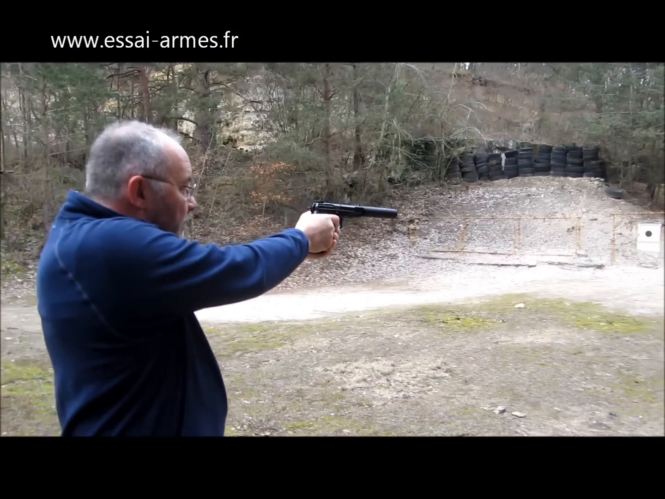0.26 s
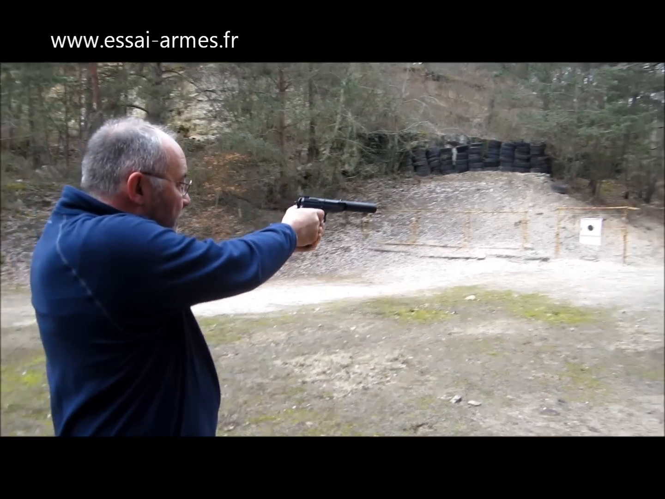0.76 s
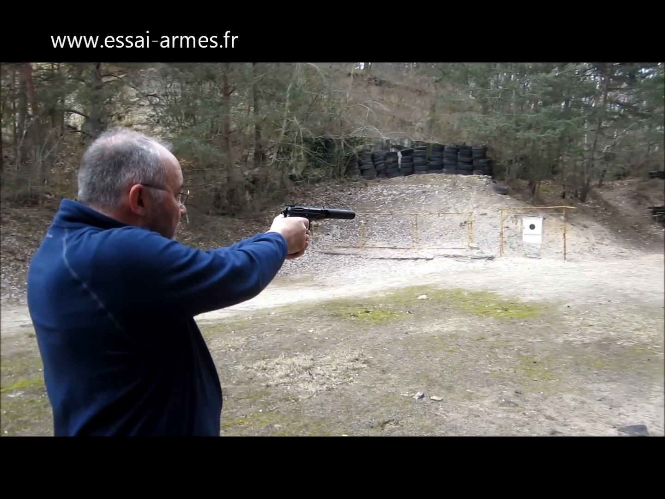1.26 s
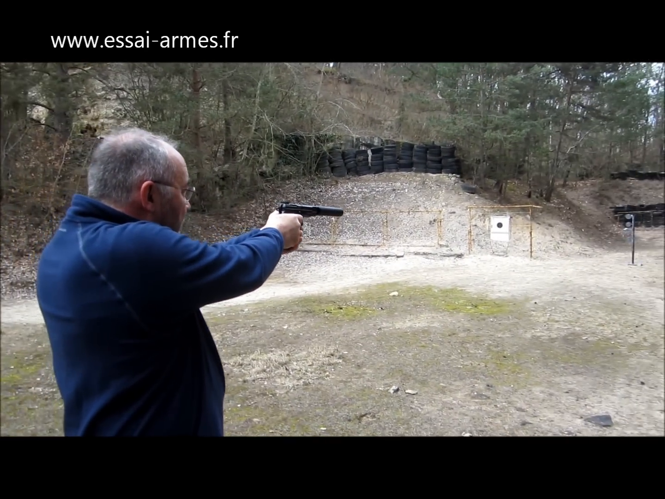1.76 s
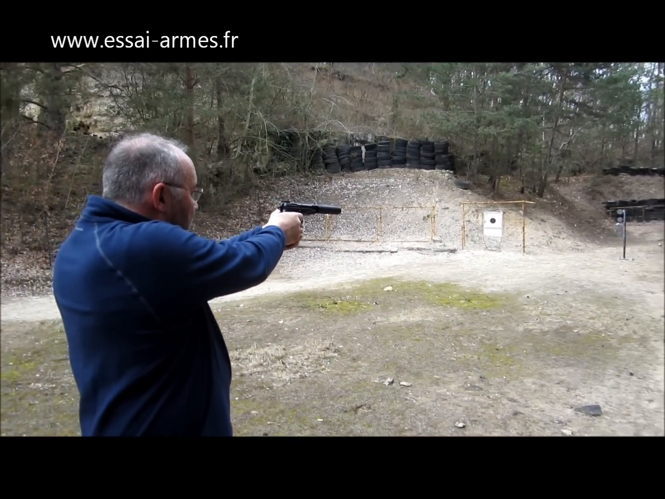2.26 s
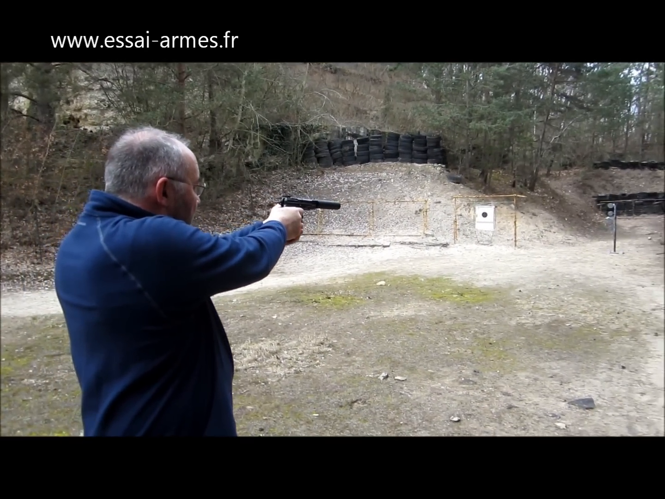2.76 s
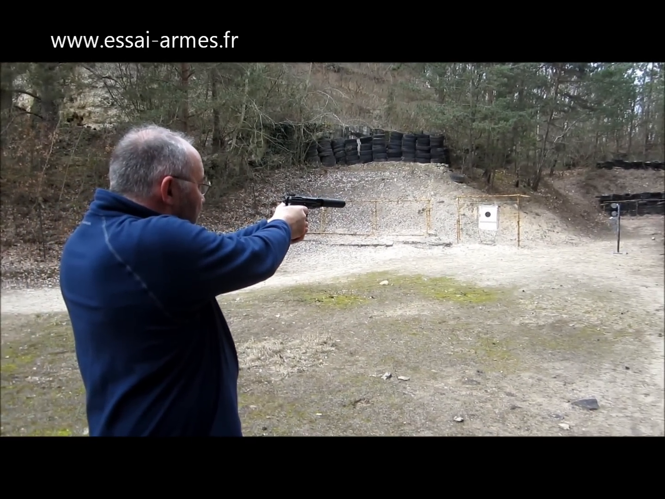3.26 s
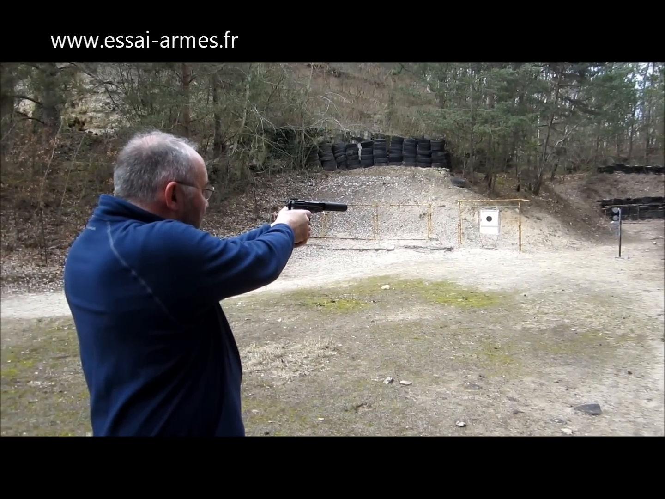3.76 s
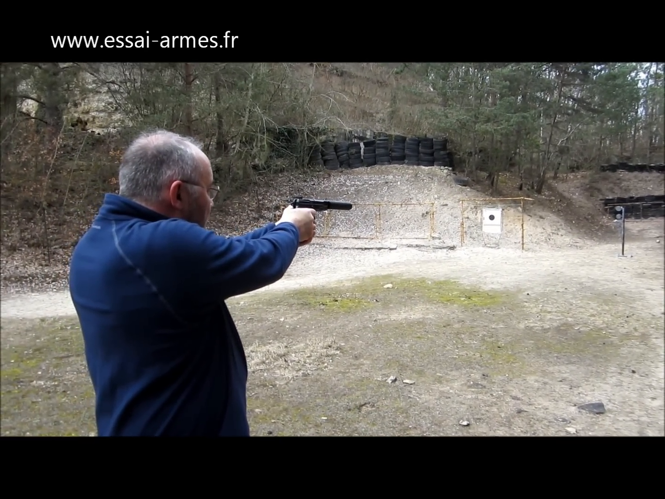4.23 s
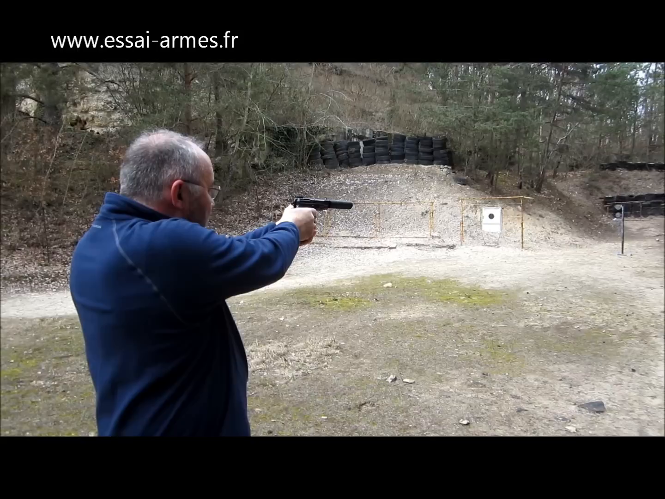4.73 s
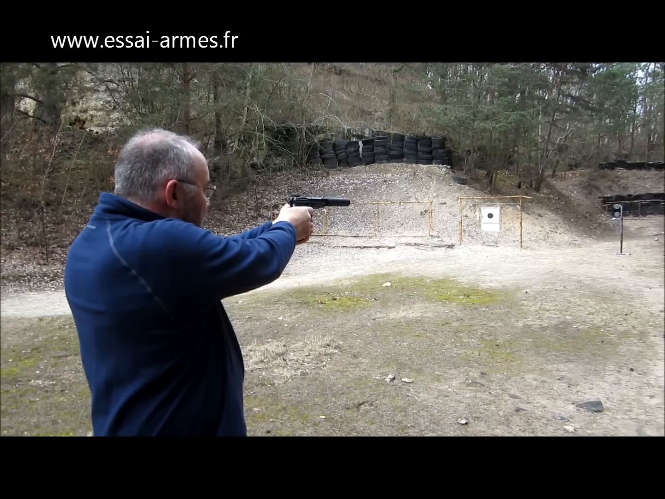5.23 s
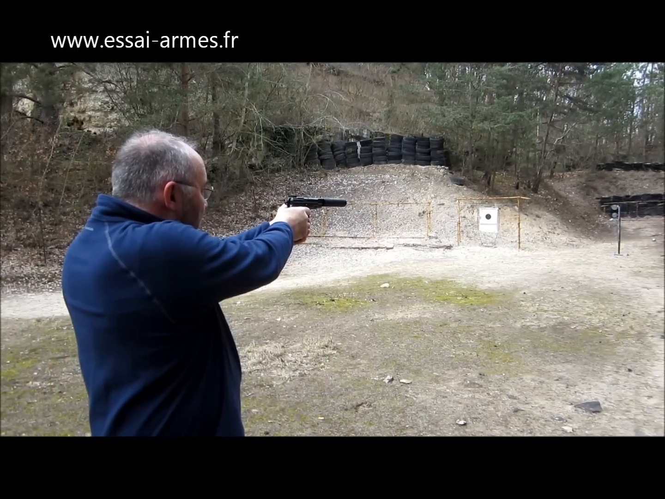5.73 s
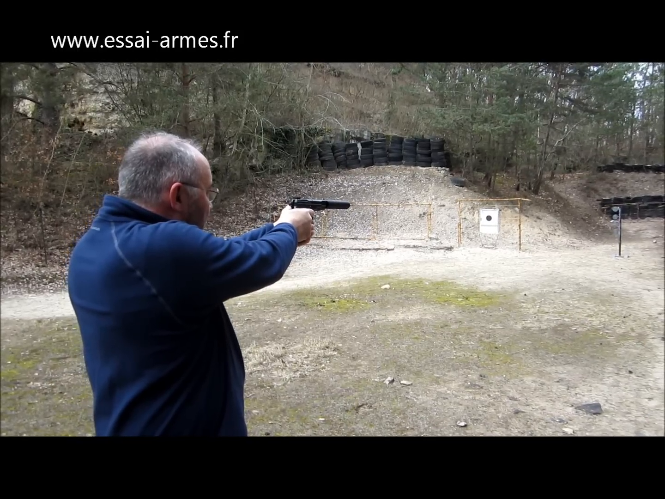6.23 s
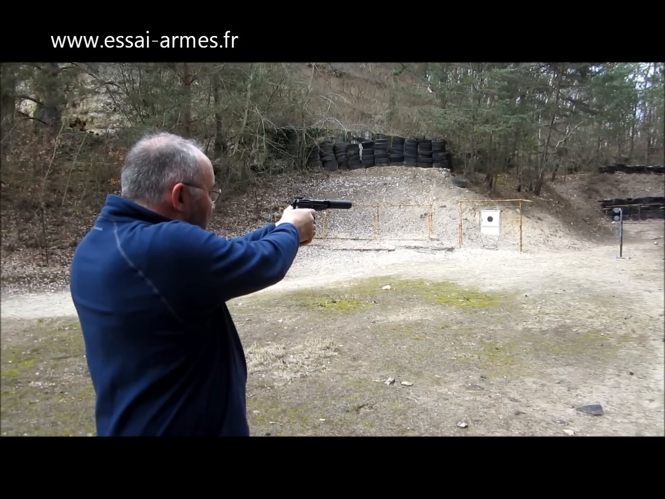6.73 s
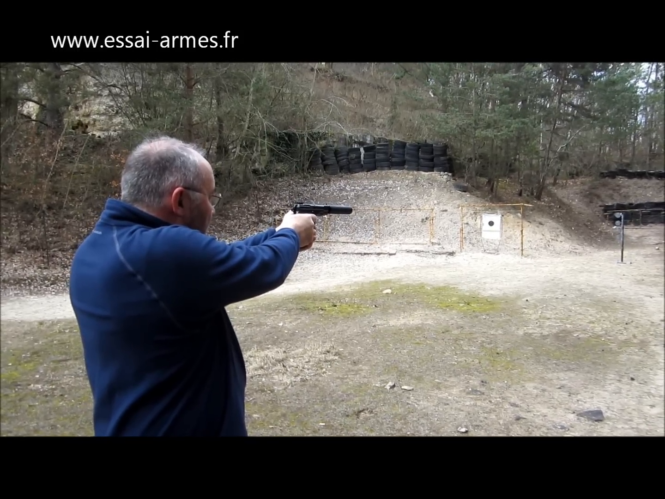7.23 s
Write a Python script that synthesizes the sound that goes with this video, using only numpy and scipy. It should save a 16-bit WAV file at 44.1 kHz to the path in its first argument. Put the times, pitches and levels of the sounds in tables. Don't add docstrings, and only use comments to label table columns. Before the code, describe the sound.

An outdoor shooting range beside woods, heard in mono from a camera close to the shooter. For the first 0.7 seconds there is low wind, a soft distant rush, faint rustling, grit underfoot and finger knocks on the camera. At 0.7 a suppressed pistol fires: a very short, bright, dry snap with a puff of gas, then two steel slide clacks within thirty milliseconds. At 0.83 the bullet cracks on a far steel plate, which clangs and rings brightly as the woods return a hissy splash. The background ducks sharply and creeps back over roughly a second. Brass cases tick from 1.0; knocks and tiny buckle tinks follow around 1.8 to 2.1. The second shot comes at 3.0, its plate hit at 3.1; the third at 5.2, ringing at 5.3. Faint case ticks and grit follow, then recovering distant rush and light wind until 7.5.

```python
import sys
import numpy as np
from scipy import signal
from scipy.fft import rfft, irfft, next_fast_len
from scipy.io import wavfile
from scipy.ndimage import uniform_filter1d, map_coordinates

SR = 44100
rng = np.random.default_rng(int(sys.argv[2]) if len(sys.argv) > 2 else 0)


def volts_from_decibels(level):
    exponent = np.asarray(level, float) / 20
    return 10 ** exponent


def wav_out(sig):
    wavfile.write(sys.argv[1], SR, np.round(np.clip(np.atleast_2d(sig).T, -1, 1) * 32767).astype(np.int16))


N = 330309

# start_s, peak_db
SHOTS = [
    (0.7118, 2),
    (2.9956, 2),
    (5.1768, 3),
]
# start_s, peak_db
SLIDE_BACK = [
    (0.7217, -5),
    (3.0048, -4),
    (5.1861, -5),
]
# start_s, peak_db
SLIDE_SHUT = [
    (0.7427, -11),
    (3.0252, -9),
    (5.2062, -9),
]
# lag_s after the blast, rms_db, centre_hz, width_hz, hold_s, t60_s
SHOT_STAGES = [
    (-.004, -29, 7000, 6000, .0008, .012),
    (-.0017, -27, 4500, 5000, .0015, .012),
    (.0004, -13, 10500, 2200, .0012, .006),
    (0, -17, 4300, 1500, .0008, .006),
    (.0008, -11, 8000, 6000, .004, .008),
    (.0012, -19, 2000, 1200, .004, .008),
    (.006, -25, 6500, 5500, .003, .11),
]
# pitch_hz, level_db, t60_s
MUZZLE_SNAP = [(11600, -.5, .004), (4300, -11, .006)]
# lag_s after the blast, level_db, pitch_hz
GAS_PUFFS = [(.0031, -4.5, 1300), (.0044, -6, 1900), (.003, -15, 680)]
# lag_s after the blast, level_db, pitch_hz, hold_s, t60_s
BAFFLE_RING = (.0047, -11.5, 6000, .0019, .005)
# pitch_hz, level_db per Hz
NEAR_ECHOES = [(710, -41.5), (1200, -8.5), (6110, -4), (11900, -10), (15000, -16.5), (16300, -27.5)]
# pitch_hz, level_db, t60_s
SLIDE_MODES = [(2200, -12, .01), (3500, -6, .014), (5700, -10, .02), (7200, -11, .01), (10500, -7, .018)]
FRAME_HZ, FRAME_DB, FRAME_T60_S = 1060, -21, .018

# start_s, crack_db, splash_db, rattle_db, swell_s
PLATE_HITS = [
    (0.8258, -12.5, -26, -17, 0.0065),
    (3.1093, -12, -24, -17.5, 0.008),
    (5.2911, -12, -22.5, -19, 0.0035),
]
PLATE_MODES_HZ = [2014, 2055, 2348, 2416, 2965, 3065, 4052, 4074, 4185, 5268, 5395, 8200, 8304, 8632, 8950,
                  10310, 10570, 12695, 13465, 13700, 14260, 14610]
# t60_s, after_ring_db, first_hit_db, second_hit_db, third_hit_db
PLATE_LEVELS = [(0.97, -5.5, -64, -57.5, -53), (0.24, -6, -69, -62, -48), (0.37, -7.5, -70, -71, -45),
                (0.23, 4, -67, -60, -48.5), (0.33, -14, -62, -50, -36.5), (0.22, -16, -69, -39.5, -44),
                (0.34, 3, -45.5, -55, -61), (0.25, 3.5, -46, -44.5, -61), (.25, -13, -37, -54, -50.5),
                (0.59, -18, -37.5, -40, -43), (0.43, -1.5, -57, -49, -40), (0.39, -31, -29.5, -25, -36),
                (0.31, -12, -19, -22.5, -27), (0.17, -10, -39, -23.5, -53), (0.33, -22.5, -61, -29, -27.5),
                (.3, -20, -56, -51, -60), (0.28, -21, -56, -55, -61.5), (.28, -16, -59, -67, -51),
                (0.27, -22, -40, -53, -62), (.26, -25, -64, -38, -47), (.28, -24, -60, -68, -64),
                (.25, -23, -52, -68, -45)]
# pitch_hz, t60_s
AFTER_RING = [(2000, 1.55), (4000, 0.94), (8000, 0.75), (14000, 0.6)]
PLATE_SWING = [(1, .003), (1, .003), (1.0018, .0025)]
# pitch_hz, level_db per Hz
LEAD_CRACK = [(88, -42), (150, -21), (1070, -15.5), (4220, -5), (6890, -5), (8060, -2), (11900, -4),
              (14500, -21), (16300, -30.5)]
# pitch_hz, level_db per Hz
LEAD_SPLASH = [(150, -22), (400, -13), (900, -12.5), (2000, -6), (4500, -2), (7000, -3), (11000, -3),
               (16000, -12)]
# pitch_hz, t60_s
WOODS_DECAY = [(300, 0.35), (800, 0.59), (2000, 0.93), (5500, 0.74), (9000, 0.48), (12000, 0.35),
               (15500, .28)]
# start_s, rms_db, centre_hz, width_hz, t60_s
HANGER_CLANG = [(0.8255, -17.5, 4100, 540, 0.018), (0.825, -14.5, 7600, 898, 0.0079),
                (3.1095, -29.5, 2300, 770, 0.066), (3.112, -15, 7600, 3000, 0.0035),
                (5.292, -26.5, 1940, 190, 0.057), (5.293, -29.5, 2950, 190, .15),
                (5.297, -33, 2620, 380, 0.044), (5.342, -33, 2610, 640, 0.042), (5.311, -46, 2280, 450, 1),
                (5.2925, -34, 5460, 260, 0.24)]
POST_THUDS_DB = [-25.5, -25, -30]
POST_HZ = 204

# start_s, peak_db
SPENT_CASES = [(1.0288, -41), (1.0564, -55), (1.2744, -64), (1.3719, -65), (1.9026, -55), (1.9344, -59.5),
               (2.3394, -59), (2.4583, -51), (2.491, -60), (3.3042, -42), (3.5064, -64), (3.5744, -66),
               (3.7244, -69), (3.8294, -60), (4.2691, -59.5), (4.7094, -59), (5.527, -41.5), (5.6444, -61),
               (6.1094, -53)]
CASE_HZ, CASE_SCATTER, CASE_SHARE, CASE_T60_S = 10500, .03, .22, .012
# start_s, peak_db, centre_hz
RINGING_CASE = [(1.6606, -60, 12800)]
# start_s, peak_db, centre_hz
SHOE_GRIT = [(0.0154, -45, 5430), (0.3301, -44.5, 4630), (0.381, -45, 3570), (0.4194, -48, 3160),
             (2.0985, -42, 3900), (3.8243, -50.5, 5170), (3.9046, -57, 3160), (4.3879, -52, 3850),
             (4.6299, -51.5, 3240), (6.0194, -55, 2990)]
# start_s, peak_db, centre_hz
CAMERA_KNOCKS = [(0.184, -37, 633), (0.208, -32, 620), (0.526, -39, 205), (1.369, -43, 202),
                 (1.779, -41.5, 369), (1.899, -28, 300), (2.054, -48.5, 662)]
# start_s, peak_db
BUCKLE_TINKS = [(1.77, -52), (1.80, -52), (2.019, -46), (2.05, -44), (2.096, -44.5), (2.117, -49)]
BUCKLE_HZ = 1900

# peak_s, peak_db, swell_db per s, release_db per s
BRUSHES = [(.014, -62.5, 2000, 190), (.158, -78, 100, 400), (.24, -71, 140, 100), (.316, -57, 250, 130.5),
           (.402, -54, 250, 650)]
# pitch_hz, level_db per Hz
LEAF_COLOUR = [(1470, -32.5), (2500, -7.5), (3590, -3), (5230, -8.5), (11700, -2), (14600, -11),
               (16300, -20)]
# time_s, level_db
WIND_LEVEL = [(0.0, -60), (0.14, -55), (0.54, -51), (0.79, -70), (1.69, -64.5), (1.83, -51.5),
              (2.17, -61.5), (2.88, -60), (3.06, -64), (3.42, -65.5), (4.44, -53), (4.73, -57), (5.03, -62),
              (5.4, -80), (5.72, -82), (6.53, -59), (7.18, -65), (7.49, -62.5)]
# pitch_hz, level_db per Hz
WIND_COLOUR = [(12, -8.5), (28, 3), (55, 0), (90, -9), (200, -28.5), (500, -52.5)]
# time_s, level_db
RUSH_LEVEL = [(0, -50.5), (.7, -50), (2, -47), (2.9, -48.5), (4, -47.5), (5.1, -47), (6.2, -44),
              (7.0, -46.5), (7.49, -45)]
# pitch_hz, level_db per Hz
RUSH_COLOUR = [(59, -34.5), (100, -5), (267, -0.5), (391, -4), (474, -2), (843, -2), (1260, -6),
               (2250, -10.5), (7420, -24), (8080, -24.5), (13500, -33.5), (16300, -47.5)]
# pitch_hz, level_db, warble_hz, warble_depth_rad
CAMERA_WHINE = (7867, -72, 15, 2.2)
GAIN_DIPS = [-18.5, -17, -19.5]
ONSET_S = .0005


def unit(x):
    return x / np.sqrt(np.mean(x ** 2) + 1e-20)


def along(points, hz):
    f, v = np.transpose(points)
    return np.interp(np.log(hz + 1), np.log(f + 1), v)


def curve(rows):
    return np.interp(np.arange(N) / SR, *np.transpose(rows))


def wobble(rate):
    knots = rng.standard_normal(int(N * rate / SR) + 4)
    return map_coordinates(knots, [np.arange(N) * rate / SR])


def fading(size, rate):
    knots = rng.standard_normal((2, int(size * rate / SR) + 4))
    re, im = (map_coordinates(k, [np.arange(size) * rate / SR], order=1) for k in knots)
    return (re + 1j * im) / np.sqrt(np.mean(re ** 2 + im ** 2))


def noise(size, gain):
    m = next_fast_len(size + 4096)
    spectrum = rfft(rng.standard_normal(m)) * gain(np.fft.rfftfreq(m, 1 / SR))
    return unit(irfft(spectrum, m))[:size]


def coloured(size, colour):
    return noise(size, lambda f: volts_from_decibels(along(colour, f)))


def decay(t, t60, hold=0):
    return volts_from_decibels(-60 * np.maximum(t - hold, 0) / t60)


def burst(centre_hz, width_hz, hold, t60):
    t = np.arange(round((hold + t60) * SR)) / SR
    band = noise(len(t), lambda f: f / (f + centre_hz) / (1 + ((f - centre_hz) / width_hz) ** 4))
    band = band / np.std(band[:round((hold + t60 / 8) * SR) + 8])
    rise = 1 - np.exp(-t * (centre_hz + width_hz) / 2)
    return band * rise * decay(t, t60, hold)


def push(hz, t):
    u = 2 * np.pi * hz * t
    return -np.e * u * (1 - u / 2) * np.exp(-u)


def gain_db(t):
    total = 0
    for (s, _), dip_db in zip(SHOTS, GAIN_DIPS):
        since = np.maximum(t - s - .006, 0)
        ducking = 1 - np.exp(-since / .025)
        recovery = np.exp(-(since / 1.152) ** 1.8)
        total = total + dip_db * ducking * recovery
    return total


def add(track, s, db, sound):
    part = track[round((s + ONSET_S) * SR):][:len(sound)]
    part += volts_from_decibels(db - gain_db(s)) * sound[:len(part)]


def muzzle():
    out, t = np.zeros(N), np.arange(SR // 5) / SR
    for s, db in SHOTS:
        for lag, stage_db, *shape in SHOT_STAGES:
            add(out, s + lag, db + stage_db - .5, burst(*shape))
        snap = sum(-volts_from_decibels(level) * decay(t, t60) * np.sin(2 * np.pi * hz * t)
                   for hz, level, t60 in MUZZLE_SNAP)
        add(out, s, db, snap)
        for lag, puff_db, hz in GAS_PUFFS:
            add(out, s + lag, db + puff_db, push(hz, t))
        lag, ring_db, hz, hold, t60 = BAFFLE_RING
        add(out, s + lag, db + ring_db, np.sin(2 * np.pi * hz * t) * decay(t, t60, hold))
        add(out, s + .025, db - 41, coloured(len(t), NEAR_ECHOES) * decay(t, .9))
    return out


def slide():
    out, t = np.zeros(N), np.arange(SR // 5) / SR
    frame = np.sin(2 * np.pi * FRAME_HZ * t) * decay(t, FRAME_T60_S) * (1 - np.exp(-t * FRAME_HZ))
    for s, db in SLIDE_BACK + SLIDE_SHUT:
        ring = 0
        for hz, level, t60 in SLIDE_MODES:
            strength = volts_from_decibels(level + rng.normal(0, 2))
            pitch = hz * (1 + rng.normal(0, .026))
            ring = ring + strength * decay(t, t60) * np.sin(2 * np.pi * pitch * t)
        add(out, s, db - 2, ring * (1 - np.exp(-t / .0001)))
        add(out, s, db + FRAME_DB, frame)
        add(out, s, db - 12, burst(8000, 6000, .0016, .014))
        add(out, s + .005, db - 23, burst(5500, 4500, .003, .03))
        add(out, s + .0105, db - 23, burst(5500, 4500, .001, .015))
    return out


def plate():
    out, t = np.zeros(N), np.arange(SR) / SR
    for k, ((s, *_, swell), (rest, drop)) in enumerate(zip(PLATE_HITS, PLATE_SWING)):
        heard = rest * (t - drop * .11 * (1 - np.exp(-t / .11)))
        ring = 0
        for hz, (t60, after_db, *level) in zip(PLATE_MODES_HZ, PLATE_LEVELS):
            rough = min(1, (3000 / hz) ** 1.6 + (hz / 16000) ** 4)
            direct = decay(t, t60) * (1 + rough * fading(len(t), 45))
            after = volts_from_decibels(after_db) * decay(t, along(AFTER_RING, hz)) * (.6 + .7 * fading(len(t), 30))
            tone = np.exp(2j * np.pi * hz * heard)
            ring = ring + volts_from_decibels(level[k]) * np.imag((direct + after) * tone)
        add(out, s, 0, ring * (1 - np.exp(-t / swell)))
    return out


def woods_answer(colour):
    hz, t, z = signal.stft(coloured(2 * SR, colour), SR, nperseg=256)
    fall = decay(t, along(WOODS_DECAY, hz)[:, None])
    return signal.istft(z * fall, SR, nperseg=256)[1][:2 * SR]


def lead_impact():
    out, t = np.zeros(N), np.arange(SR) / SR
    for s, db, splash_db, rattle_db, _ in PLATE_HITS:
        crack = coloured(len(t), LEAD_CRACK)
        crack = crack / np.std(crack[:SR // 1000])
        add(out, s, db - 4, crack * decay(t, .004, .0005))
        add(out, s, db + rattle_db + 5, crack * decay(t, .075))
        splash = woods_answer(LEAD_SPLASH)[:len(t)] * (1 - np.exp(-t / .0085))
        add(out, s, db + splash_db + 4, splash)
    return out


def clang():
    out, t = np.zeros(N), np.arange(SR // 20) / SR
    for (s, *_), db in zip(PLATE_HITS, POST_THUDS_DB):
        add(out, s, db, push(POST_HZ, t))
    for s, db, hz, width_hz, t60 in HANGER_CLANG:
        hit = min((row[0] for row in PLATE_HITS), key=lambda h: abs(h - s))
        add(out, max(s, hit), db, burst(hz, width_hz, t60 / 20, t60))
    return out


def contacts(rows, share, t60):
    out = np.zeros(N)
    for s, db, hz in rows:
        add(out, s, db - 3.5, burst(hz, share * hz, .00085, t60))
    return out


def spent_cases():
    scatter = 1 + CASE_SCATTER * rng.uniform(-1, 1, len(SPENT_CASES))
    ticks = [(s, db, CASE_HZ * r) for (s, db), r in zip(SPENT_CASES, scatter)]
    return contacts(ticks, CASE_SHARE, CASE_T60_S) + contacts(RINGING_CASE, .012, .06)


def handling():
    tinks = [(s, db, BUCKLE_HZ) for s, db in BUCKLE_TINKS]
    return contacts(SHOE_GRIT, .58, .026) + contacts(CAMERA_KNOCKS, .4, .032) + contacts(tinks, .08, .06)


def rustle():
    t, level = np.arange(N) / SR, 0
    for s, db, swell, release in BRUSHES:
        level = level + volts_from_decibels(db - swell * np.maximum(s - t, 0) - release * np.maximum(t - s, 0))
    crackle = volts_from_decibels(2.5 * wobble(170) + 2.2 * wobble(60))
    return volts_from_decibels(2.5) * level * unit(crackle * coloured(N, LEAF_COLOUR))


def wind():
    lumps = unit(volts_from_decibels(2.6 * wobble(16)) * coloured(N, WIND_COLOUR))
    return volts_from_decibels(curve(WIND_LEVEL) + 4 - gain_db(np.arange(N) / SR)) * lumps


def distant_rush():
    z = signal.stft(coloured(N, RUSH_COLOUR), nperseg=512)[2]
    patches = uniform_filter1d(rng.standard_normal(z.shape), 6, 0)
    patches = uniform_filter1d(patches, 14, 1)
    rush = unit(signal.istft(z * volts_from_decibels(.88 * unit(patches)), nperseg=512)[1][:N])
    return volts_from_decibels(curve(RUSH_LEVEL) + .6 * wobble(3.8)) * rush


def camera_whine():
    hz, db, warble_hz, depth = CAMERA_WHINE
    turn = 2 * np.pi * np.arange(N) / SR
    level = volts_from_decibels(db + 4.5 + 1.5 * wobble(25))
    return level * np.sin(hz * turn + depth * np.sin(warble_hz * turn))


def scene():
    shots = muzzle() + slide()
    target = plate() + lead_impact() + clang()
    nearby = spent_cases() + handling() + rustle()
    background = wind() + distant_rush() + camera_whine()
    return (shots + target + nearby + background)[None]


def low_pass(x):
    return signal.sosfilt(signal.butter(12, 16480, fs=SR, output="sos"), x)


def record(dry):
    x = dry * volts_from_decibels(gain_db(np.arange(N) / SR))
    x = signal.sosfilt(signal.ellip(8, .5, 50, 15800, fs=SR, output="sos"), x)
    return low_pass(np.clip(x, -1, 1))


dry = scene()
out = record(dry)
wav_out(out)
```